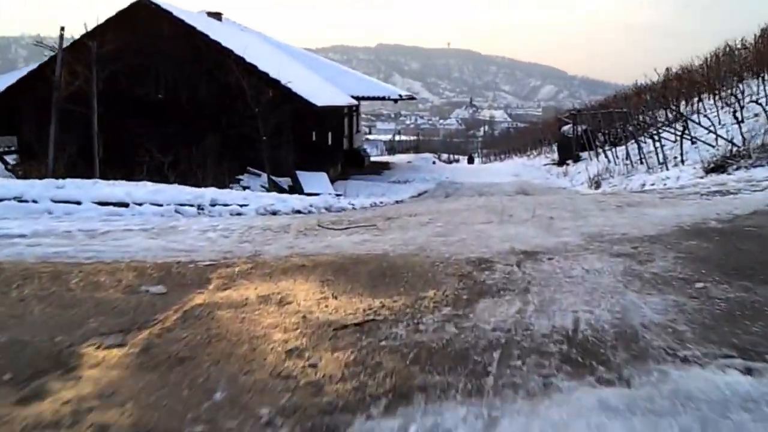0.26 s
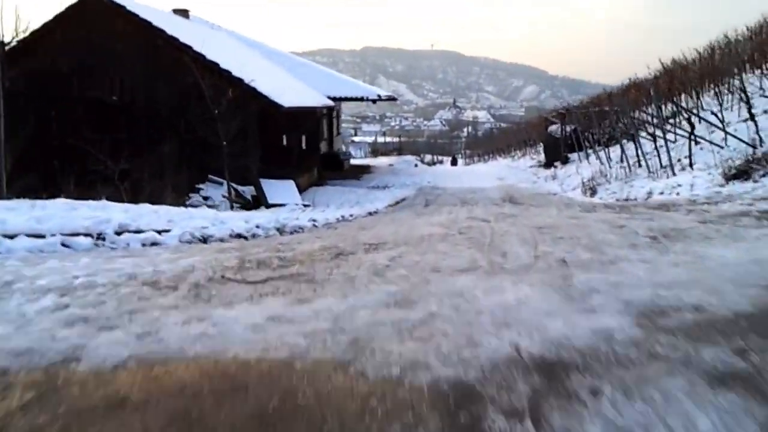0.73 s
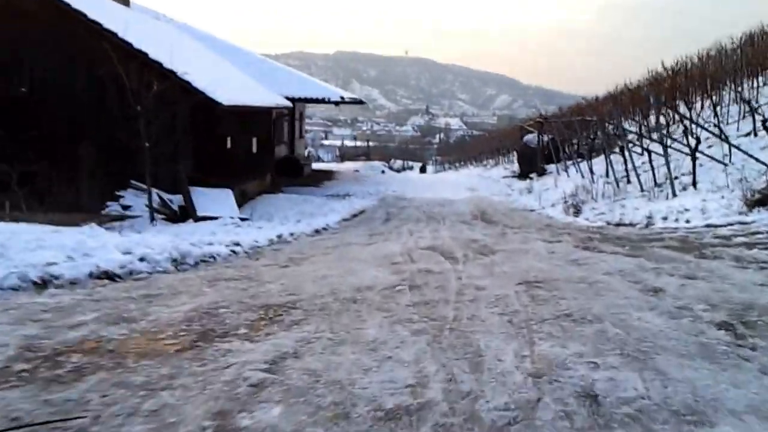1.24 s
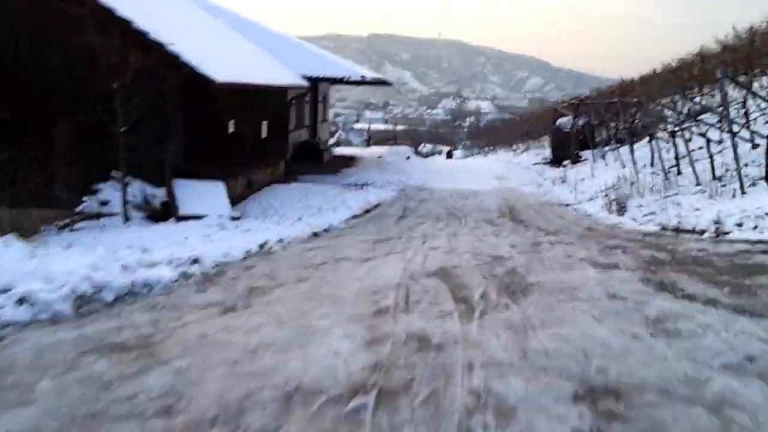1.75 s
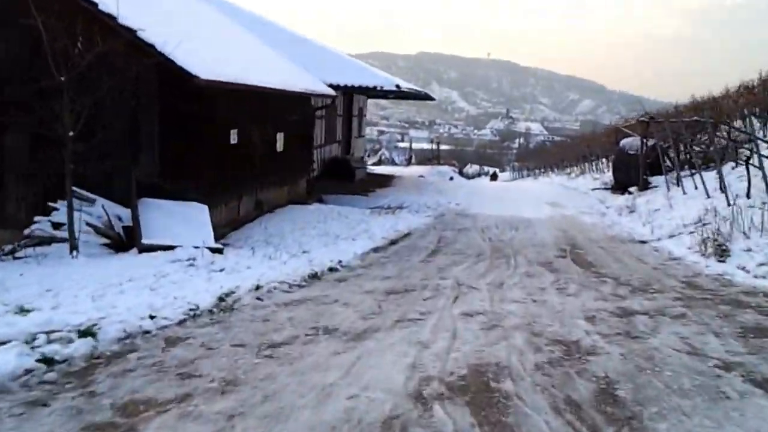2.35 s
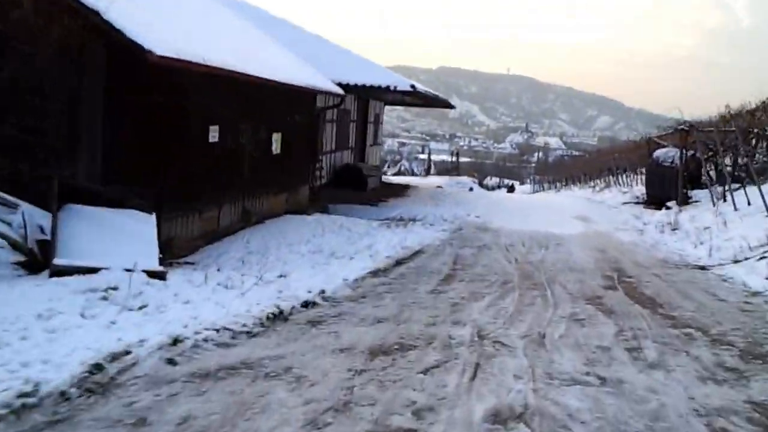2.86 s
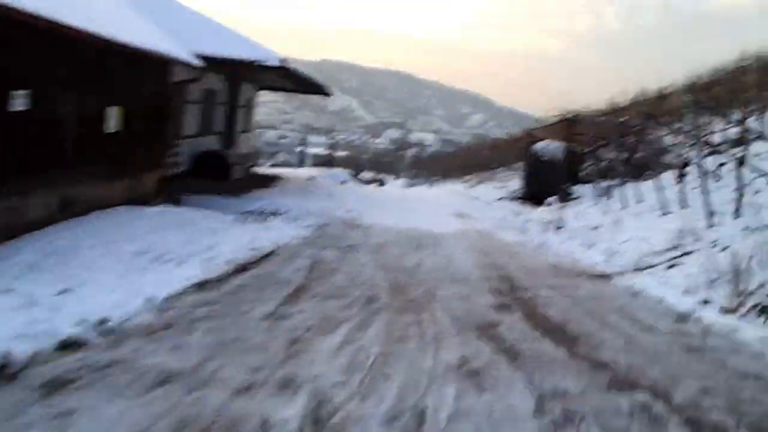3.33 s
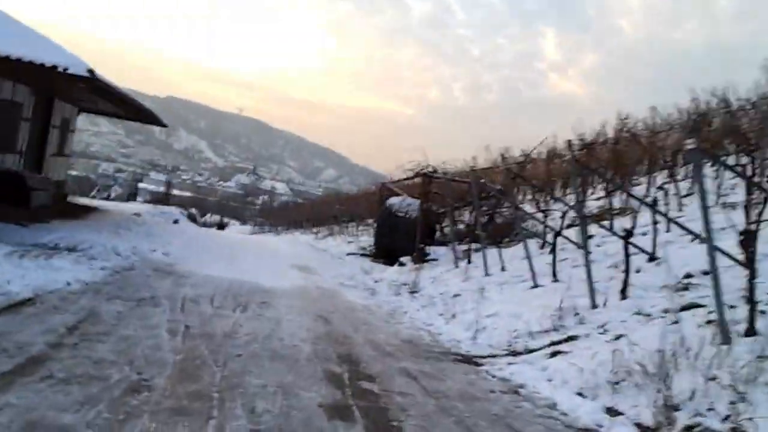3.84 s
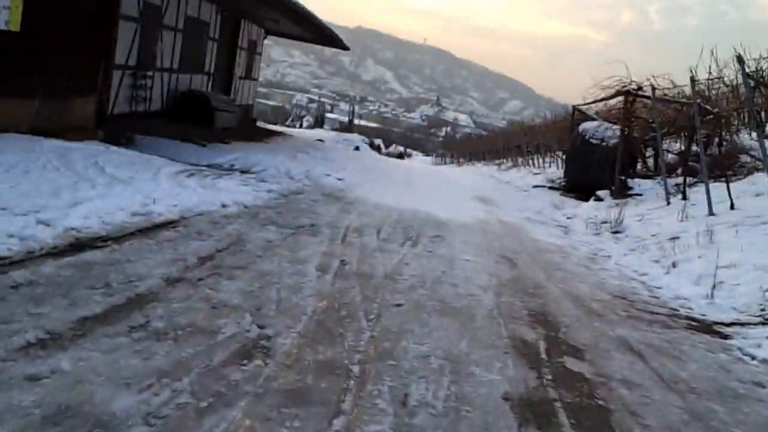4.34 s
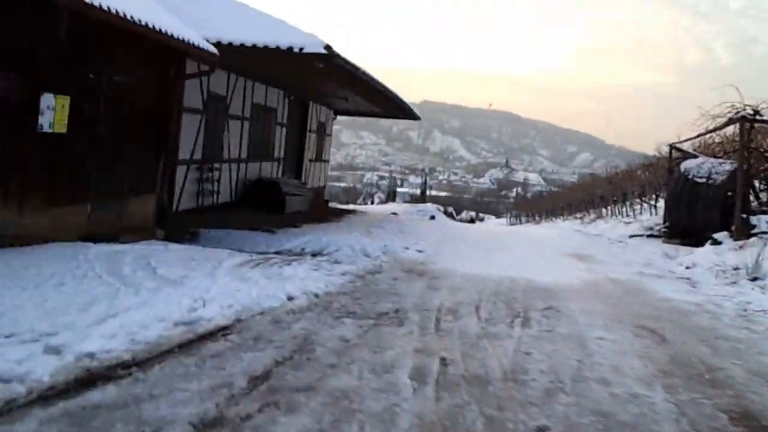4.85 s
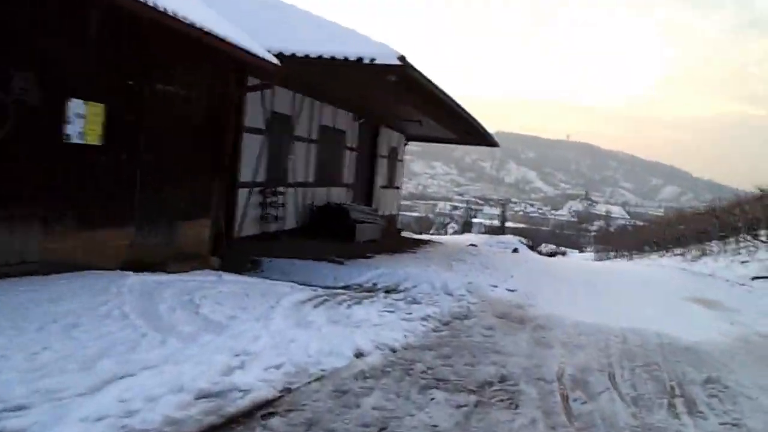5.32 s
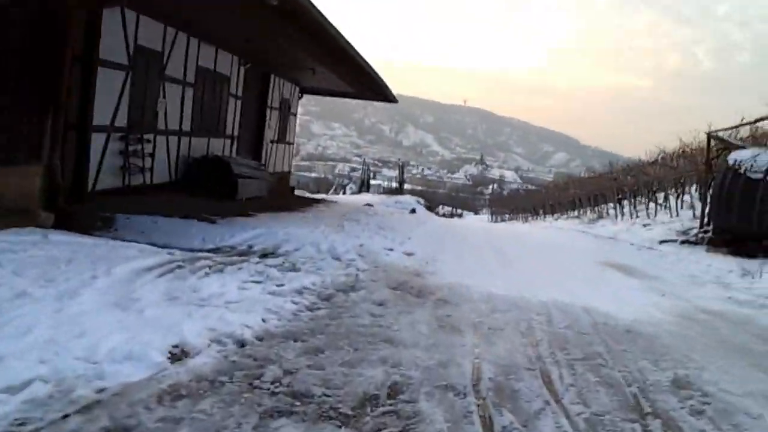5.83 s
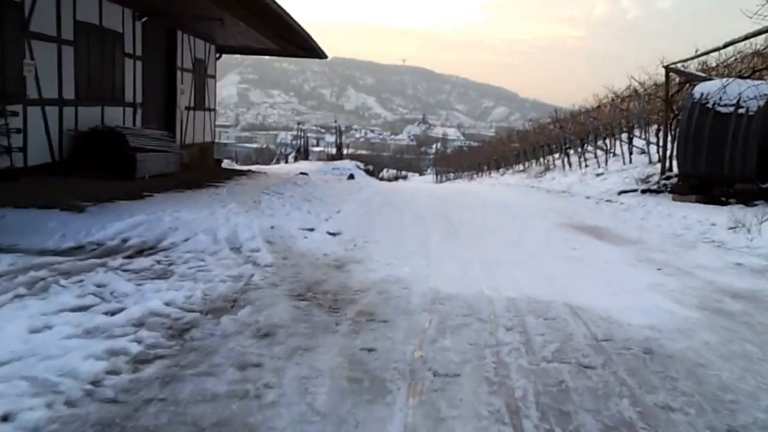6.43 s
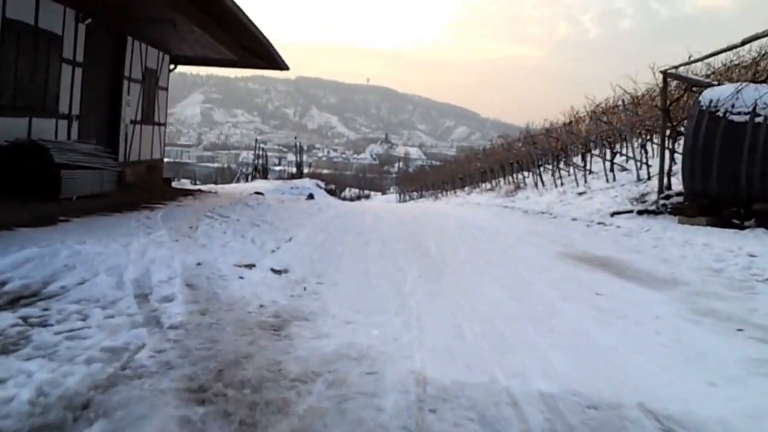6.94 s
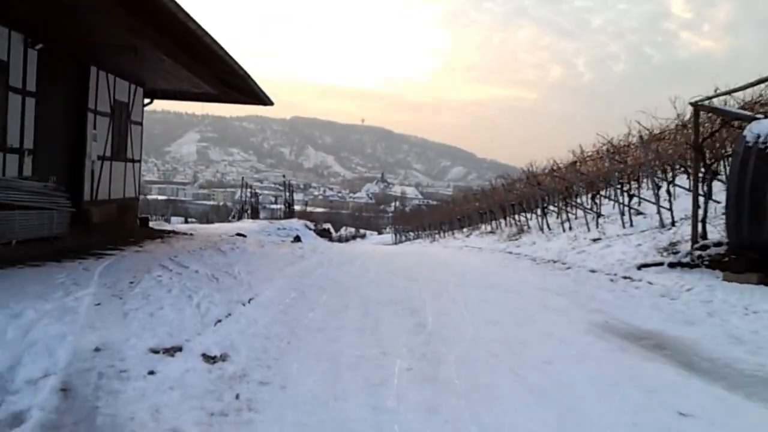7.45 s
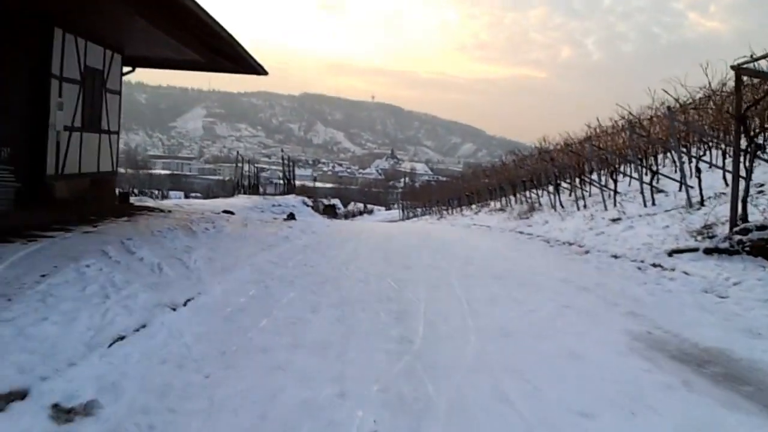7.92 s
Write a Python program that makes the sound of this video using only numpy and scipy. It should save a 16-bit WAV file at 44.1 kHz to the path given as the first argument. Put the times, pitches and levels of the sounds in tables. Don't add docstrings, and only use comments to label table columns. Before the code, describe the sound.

Close onboard sled ride: gritty icy scraping, flapping wind blasts strongest at right, a quieter stretch of singing steel, then renewed gusts and softer hiss.

```python
import sys
import numpy as np
from scipy import signal
from scipy.io import wavfile
from scipy.ndimage import uniform_filter1d

SR = 44100
rng = np.random.default_rng(int(sys.argv[2]) if len(sys.argv) > 2 else 0)


def generate_wav(signal):
    frames = np.transpose(np.atleast_2d(signal))
    scaled = np.clip(frames, -1, 1) * 32767
    pcm = np.round(scaled).astype(np.int16)
    wavfile.write(sys.argv[1], SR, pcm)


def gain_from_decibels(decibels):
    exponent = np.asarray(decibels, float) / 20
    return 10 ** exponent


N = 360738
TIME = np.arange(N) / SR
HZ = np.fft.rfftfreq(512, 1 / SR)


def evened(x):
    return x / np.sqrt(np.mean(x ** 2, -1, keepdims=True) + 1e-20)


def read(rows):
    f, *columns = np.transpose(rows)
    return np.array([np.interp(np.log(HZ + 1), np.log(f), c) for c in columns])[..., None]


def follow(rows):
    s, *columns = np.transpose(rows)
    return np.array([np.interp(TIME, s, c) for c in columns])


def noise(colour_db, same=0, lead=0, patchy_db=2.0):
    a, b, c, d, patch = rng.standard_normal((N // 128 + 5, 257, 5)).T
    patch = uniform_filter1d(patch, size=6, axis=0)
    patch = uniform_filter1d(patch, size=14, axis=1)
    right = a + 1j * b
    own = c + 1j * d
    same = np.clip(same, 0, 1)
    left = same * right * np.exp(1j * lead) + np.sqrt(1 - same ** 2) * own
    z = np.array([left, right]) * gain_from_decibels(colour_db + patchy_db * patch / patch.std())
    return signal.istft(z, nperseg=512, noverlap=384)[1][:, :N]


def flicker(hz, depth_db, channels=1):
    x = signal.lfilter(*signal.butter(2, hz, fs=SR), rng.standard_normal((channels, N)))
    return evened(gain_from_decibels(depth_db * np.clip(evened(x), -3, 1.6)))


def hump(s, ms, rise=1, order=2):
    at = round(s * SR)
    part = slice(max(at - 2200, 0), at + 2200)
    u = (TIME[part] - s) * 2000 / ms
    u = np.where(u < 0, u / rise, u * rise)
    return part, np.exp(-np.log(2) * abs(u) ** order)


def gust(start, end, start_db, end_db):
    edge_s = 0.054
    gate = np.clip(np.minimum(TIME - start, end - TIME) / edge_s + .5, 0, 1)
    return (gate * gain_from_decibels(np.interp(TIME, [start, end], [start_db, end_db]))) ** 2


def flow():
    # t/s, left level/dB, right level/dB
    breeze = [(0, -16.5, -21.5), (1, -22.5, -17), (1.3, -31, -17.5), (2.3, -24.5, -22), (3.4, -31, -19.5),
              (3.52, -33, -23), (3.8, -39, -22), (4, -41, -44), (4.4, -36, -38), (4.68, -36, -60),
              (5.2, -35, -48), (5.4, -29, -39), (5.6, -30.5, -43), (6.47, -32, -32), (6.78, -35, -40),
              (7.2, -26.5, -23), (7.45, -47, -31), (8.18, -33, -29)]
    # start t/s, end t/s, start level/dB, end level/dB
    gusts_left = [(-.1, .14, -13, -25), (0.323, 0.498, -16, -15), (0.723, 0.904, -17.5, -19),
                  (1.34, 2.1, -17, -21), (2.247, 2.565, -22, -15), (2.885, 3.068, -21, -21),
                  (3.597, 3.86, -23, -33), (5.333, 5.787, -38, -18), (6.46, 6.777, -28.5, -24.5),
                  (7.017, 7.237, -24, -48), (7.752, 8.3, -30, -29)]
    # start t/s, end t/s, start level/dB, end level/dB, share of fast eddies level/dB
    gusts_right = [(-.1, 0.358, -16, -14, -14), (0.376, 0.89, -11.5, -15, -6), (1.063, 1.309, -9.5, -14, 2),
                   (1.437, 1.93, -14, -11.5, -10.5), (2.023, 2.214, -11.5, -9, -4),
                   (2.27, 2.473, -24, -17, -8), (2.494, 2.827, -5.5, -11.5, -3.5),
                   (2.857, 3.148, -3.5, -11, -2.5), (3.143, 3.455, -12, -11.5, 1),
                   (5.756, 6.078, -13.5, -9, -12), (6.047, 6.45, -12, -11, -8.5),
                   (7.266, 7.694, -10, -12, -12), (7.67, 8.065, -17, -15, -13)]
    breeze_fast_db = -5
    left, right = gain_from_decibels(follow(breeze)) ** 2
    fast = right * gain_from_decibels(breeze_fast_db) ** 2
    left = left + sum(gust(*row) for row in gusts_left)
    for *row, fast_db in gusts_right:
        power = gust(*row)
        right = right + power
        fast = fast + power * gain_from_decibels(fast_db) ** 2
    return 10 * np.log10([left, right, fast])


def skid():
    # start t/s, end t/s, level/dB, start f/Hz, end f/Hz, bandwidth f/Hz
    sing = [
        (3.447, 3.76, -23.5, 1400, 1440, 120),
        (3.93, 4.807, -27.5, 1030, 1130, 130),
        (4.164, 4.84, -22, 2720, 2580, 300),
        (4.38, 4.828, -24.5, 3070, 2960, 400),
        (4.04, 4.2, -25, 1780, 1870, 150),
        (5.57, 5.703, -19.5, 2950, 3000, 500),
    ]
    whistle = np.zeros(N)
    for start, end, db, from_hz, to_hz, width in sing:
        pitch = np.interp(TIME, [start, end], [from_hz, to_hz])
        turn = np.exp(2j * np.pi * np.cumsum(pitch) / SR)
        band = signal.lfilter(*signal.butter(1, width / 2, fs=SR), rng.standard_normal(N) / turn)
        whistle += evened((band * turn).real) * np.sqrt(gust(start, end, db, db))
    return whistle * flicker(41.0, 3.5) * gain_from_decibels(np.array([[-6], [3]]))


def load(flow_db):
    # t/s, pressure level/dB, frame-shaking roughness level/dB
    slide = [(0, -4, 3.5), (.6, -15, 3), (1, -11.5, -14.5), (1.3, -15, -1), (1.9, -10, -4.5),
             (2.3, -19, -5), (2.9, -9.5, -1.5), (3.3, -8.5, -1.5), (3.6, -12, -5), (4.5, -13.5, -5),
             (4.9, -14.5, -9), (5.25, -12, -9.5), (5.65, -15, -9.5), (5.85, -7.5, -6), (6.55, -14.5, -12),
             (7.25, -9, -13.5), (7.6, -10.5, -15), (8.18, -22.5, 0)]
    # t/s, length/ms, level/dB
    ruts = [(.09, 360, -12.5), (.36, 103, -13), (.57, 170, -3), (.685, 60, 0), (.8, 82, -4),
            (.99, 180, 5.5), (1.14, 50, -5), (1.19, 44, 6), (1.26, 180, -4.5), (1.42, 70, 4),
            (1.575, 57, -3.5), (1.756, 37, -9), (1.93, 61, 2), (2.15, 130, -4.5), (2.49, 174, 7),
            (2.69, 113, -14), (2.775, 59, -16), (2.99, 120, 6), (3.9, 50, 1), (5.2, 60, 2), (5.41, 180, -3),
            (5.94, 140, -2.5), (6.11, 120, -5.5), (6.46, 80, 0), (6.559, 100, 3), (6.91, 70, 3.5),
            (7.02, 380, -4), (7.13, 66, 2.5), (7.69, 87, -4.5), (7.98, 130, 2.5)]
    duck_from_db, duck_share, duck_s = -23.5, 0.75, 0.14
    rut_flat = 3.8
    frame_feels = 1.31
    pressure_db, rough_db = follow(slide)
    excess_db = np.maximum(flow_db[1] - duck_from_db, 0)
    change_db = -duck_share * uniform_filter1d(excess_db, round(duck_s * SR))
    for s, ms, db in ruts:
        part = slice(max(round((s - ms / 500) * SR), 0), round((s + ms / 500) * SR))
        u = (TIME[part] - s) * 2000 / ms
        change_db[part] += db * np.exp(-np.log(2) * abs(u) ** rut_flat)
    return pressure_db + np.array([change_db, rough_db + frame_feels * change_db])


def runners(flow_db):
    # t/s, hiss level/dB, relative frame rumble level/dB, length/ms
    scrapes = [(0.087, -13.5, -3.5, 12), (0.105, -4.5, -31, 3.2), (0.219, -8, -1.5, 8.6),
               (0.235, -0.5, -25, 4.1), (0.387, -13.5, 2.5, 17), (0.401, 4.5, -20, 1.7),
               (0.631, -8, -9, 11.5), (0.661, -11, 0, 18.5), (0.703, -11, -8, 21), (0.811, -15, 16, 3.3),
               (0.892, -1, -8.5, 6.7), (.932, -11, -18, 17), (1.04, -15, -5, 19), (1.444, -19.5, 12, 14),
               (1.596, -15, 5, 6.3), (1.673, -13, -9, 4.7), (2.354, -11, -10, 11), (2.403, -15, 6, 4.1),
               (2.834, -9, -20, 3), (2.955, -7, -2, 3.8), (3.477, -5, -20, 4), (3.546, -13.5, 0, 11),
               (4.257, -14.5, 1, 59), (4.959, -10, -20, 6.6), (5.01, -11, -0.5, 24), (5.433, -13, -14, 18),
               (5.524, -3.5, -0.5, 7.4), (5.582, -9, 4.5, 9.3), (5.64, -20.5, 5, 28),
               (5.691, -21.5, 15.5, 13), (5.8, -15, 2.5, 26), (6.573, -9, -13, 6), (6.686, -6.5, -1.5, 14),
               (7.115, -12.5, -6, 18)]
    # f/Hz, left level/dB, right level/dB
    ports = [(150, -70, -83), (2000, -13, -17), (4670, -15, -6.5), (6390, -19.5, -21), (7800, -13.5, -21),
             (9930, -4, -22.5), (12360, -11.5, -24.5), (15500, -21, -28.5)]
    # f/Hz, level/dB, coherence/1, lead of the left phase/rad
    frame_colour = [(120, -11, 0.32, 1.6), (274, -2, 1, 2.28), (1090, -2.5, 0.72, 2.48),
                    (1800, -1.5, 0.079, 4.6), (3000, -3, 0.94, 5.26), (5340, -8.5, 0.13, 3.1),
                    (7900, -26.5, .1, 3.2)]
    # f/Hz, bandwidth f/Hz, level/dB
    frame_modes = [(1135, 560, 10), (1416, 62, 8), (1930, 180, 4)]
    power = gain_from_decibels(load(flow_db)) ** 2
    for s, db, frame_db, ms in scrapes:
        part, shape = hump(s, ms * 1.3, rise=0.55)
        power[:, part] += (gain_from_decibels(np.array([[db], [db + frame_db - 5.5]])) * shape) ** 2
    hiss_gain, frame_gain = np.sqrt(power) * flicker(23.0, 1.0) * flicker(520.0, 0.32)
    hiss = noise(read(ports), patchy_db=1.32)
    colour_db, same, lead = read(frame_colour)
    for hz, width, db in frame_modes:
        colour_db = colour_db + db / (1 + (2 * (HZ[:, None] - hz) / width) ** 2)
    frame = evened(noise(colour_db, same, lead, patchy_db=3.0)) * gain_from_decibels(np.array([[1.5], [5.5]]))
    frame = frame * frame_gain * flicker(54.0, 1.66)
    mount = signal.butter(2, 200., "highpass", fs=SR)
    frame = signal.lfilter(*mount, signal.lfilter(*mount, frame))
    return hiss / hiss[0].std() * hiss_gain + frame


def slap(s, db, ms, hz):
    part, shape = hump(s, ms, order=4)
    wander, lumps = evened(uniform_filter1d(rng.standard_normal((2, 4400)), size=50))[:, :len(shape)]
    wander_db = min(2.8, (4200 / hz) ** 2) * wander
    turns = np.cumsum(hz * gain_from_decibels(wander_db)) / SR
    swirl = shape * gain_from_decibels(4.23 * lumps) * np.sin(2 * np.pi * turns)
    return part, gain_from_decibels(db - 6.5) * swirl * np.linalg.norm(shape) / np.linalg.norm(swirl)


def eddies(flow_db):
    # t/s, level/dB, length/ms
    smaller_eddies = [(0.216, -6, 5.8), (0.307, 0, 4.3), (0.322, -5, 4.3), (0.355, -2.5, 4.4), (0.387, -2, 7),
                      (0.436, -2, 4.6), (0.532, 6, 4), (0.57, -5, 5), (0.612, 2.5, 2.9), (0.655, -3, 7),
                      (0.759, -0.5, 3.9), (0.813, 1, 4), (0.875, -5, 5), (0.95, -1, 3.6), (1.069, -2, 18),
                      (1.103, -3, 4.7), (1.116, 7, 3.6), (1.146, -1, 16), (1.21, 1.5, 10), (1.225, 2, 7.7),
                      (1.238, -0.5, 7.8), (1.271, -3.5, 9), (1.287, 0.5, 8), (1.305, -2, 4.3),
                      (1.513, -0.5, 13), (1.578, -1, 3.7), (1.661, 4, 3.5), (1.708, -2, 7.5), (1.719, 0, 2.7),
                      (1.742, -4, 6.5), (1.758, -3, 4.8), (1.858, 2, 6.2), (1.874, 1, 2.7), (2.0, 1, 7),
                      (2.044, -4, 4.1), (2.165, -2, 11), (2.18, -3, 18), (2.344, -11, 4), (2.381, -16, 5.1),
                      (2.46, -1, 15), (2.557, 0, 13), (2.614, -5, 6.8), (2.643, -3, 19), (2.693, 1, 5),
                      (2.724, 0, 6), (2.762, -3.5, 5), (2.888, 8, 4.4), (2.972, 6, 6.8), (2.995, 1, 16),
                      (3.04, 3, 11), (3.05, 4, 4.6), (3.136, 0, 3), (3.164, 2, 8), (3.202, -3, 4),
                      (3.21, -1.5, 7), (3.302, 0, 6.4), (3.34, 2, 9), (3.373, -2, 5.9), (3.4, 0, 5),
                      (3.417, -1, 4.9),
                      (5.793, -2, 6.2), (5.818, -7, 7.1), (5.859, -4, 4), (5.903, 1.5, 5), (5.931, 1, 5.5),
                   (5.956, -9, 3.7), (5.977, -1, 5.5), (5.997, 0, 7.9), (6.013, 0, 7.3),
                   (6.058, -2.5, 12.5), (6.083, 1, 4), (6.121, -3, 4), (6.131, -2, 8.1), (6.167, -6, 2.3),
                   (6.18, -2, 4.9), (6.194, -5, 4), (6.215, 1, 6.5), (6.236, -2, 7), (6.263, -1, 3),
                   (6.283, 5, 3.6), (6.342, 2, 5.5), (6.386, -9, 14), (6.402, -6, 7.6), (6.415, 1, 4.1),
                   (6.686, -8, 5), (7.108, -7.5, 3.3), (7.231, -2, 2.8), (7.258, -5.5, 14), (7.281, 0, 2.7),
                   (7.314, -0.5, 5.7), (7.335, -1.5, 6.5), (7.345, -2, 4.2), (7.361, 3, 3.5),
                   (7.397, -3, 10), (7.407, 0, 4.7), (7.422, -4, 4), (7.447, 0, 6.6), (7.48, -9, 4.3),
                   (7.508, 1, 5.1), (7.515, -11, 9.8), (7.529, -8, 6.5), (7.56, 3, 4.3), (7.571, -8, 2.7),
                   (7.584, 0, 6.4), (7.601, -1, 5), (7.61, 0, 3.6), (7.664, -1, 6), (7.702, 6, 4.5),
                   (7.724, -5, 3.8), (7.741, -1, 3.3), (7.753, -7, 5.6), (7.775, -6, 4.4),
                   (7.789, -2.5, 2.6), (7.875, -5.5, 6), (7.965, -8, 8), (7.981, -3.5, 11),
                   (8.081, -0.5, 4.6), (8.121, -10.5, 7.9)]
    base_hz, hz_per_db = 950, 21
    s, db, ms = np.transpose(smaller_eddies)
    _, right_db, fast_db = flow_db[:, (s * SR).astype(int)]
    hz = base_hz + hz_per_db * (fast_db - right_db)
    hz = hz * np.exp(0.0815 * rng.standard_normal(len(s)))
    return zip(s, db, ms, hz)


def wind(flow_db):
    # f/Hz, left level/dB, right level/dB
    air_colour = [(25, -12, -14), (91.5, -4, -37), (300, 4.5, 0), (550, -5.5, 1), (1000, -19.5, -9.5),
                  (2240, -21.5, -39), (6060, -41, -61)]
    # t/s, length/ms
    lulls = [(0.344, 9.3), (0.739, 10), (0.839, 18), (1.783, 22), (2.218, 25), (2.246, 18), (2.427, 11),
             (2.795, 22), (2.922, 97), (3.092, 17), (5.126, 29), (5.719, 36), (5.743, 27), (5.872, 10),
             (6.069, 11), (6.103, 10), (6.252, 15), (6.325, 9.9), (6.444, 16), (7.38, 6.9), (7.489, 15),
             (7.68, 22), (7.819, 36), (8.007, 18), (8.031, 23)]
    # t/s, level/dB, length/ms, f/Hz
    slaps_left = [(0.014, -3, 27, 411), (0.227, -11, 14, 505), (0.245, -7, 19, 355), (0.391, -3, 27, 681),
                  (0.472, -6, 6.9, 352), (0.607, -1.5, 11, 404), (0.748, -10, 12, 476),
                  (0.809, -5, 25, 501), (0.876, 2, 5.5, 437.7), (1.423, -6, 8.2, 353),
                  (1.546, -12, 19, 458), (1.611, -9, 36, 422), (1.783, -6, 14, 329), (2.019, 5, 5.6, 368),
                  (2.089, 2.5, 3.7, 343), (2.341, -1, 8.4, 398), (2.373, -5, 8.7, 360),
                  (2.541, -5, 7.9, 640), (2.583, -5, 6.2, 487), (2.956, -13, 8.1, 673),
                  (4.564, -4.5, 7.7, 1080), (5.174, -7, 14, 1090), (5.381, -4.5, 4, 340),
                  (5.514, -6, 10, 880), (5.697, -4, 5.2, 502), (6.688, -11, 7.7, 657), (.091, -8, 4, 666),
                  (0.179, -13, 3.2, 554), (.313, -4, 9.1, 416), (0.453, -12, 4.6, 400),
                  (.985, -4, 4.9, 605), (1.474, -8, 8.2, 480), (1.951, -5, 3.7, 468), (2.26, -4, 6.2, 506),
                  (7.82, -12, 5, 329), (7.881, -9, 12, 277), (8.147, -10, 12, 300)]
    # t/s, level/dB, length/ms, f/Hz
    chips_left = [(0.147, -6, 3, 1815), (.811, 1, 0.99, 2000), (1.179, -6, 5, 600), (2.383, -3, 4.3, 1490),
                  (3.905, -13.5, 16, 449), (5.18, -11, 29, 479), (5.441, -8, 5.9, 374),
                  (5.692, -3, 7.6, 2510), (5.793, -6, 6.8, 1250), (6.776, -3.5, 8, 318),
                  (7.753, -9, 11, 916), (7.918, -13, 8, 1250), (8.121, -19, 5, 1500)]
    # t/s, level/dB, length/ms, f/Hz
    slaps_right = [(0.487, 3, 18, 742), (0.513, 2, 11, 675), (0.646, 0, 6.7, 804), (1.086, 1.5, 58, 784),
                   (1.685, 5, 4.5, 526), (2.076, 16, 11, 640), (2.114, 9.5, 18.5, 739), (2.157, 3, 16, 710),
                   (2.492, 2, 9.2, 483.6), (2.514, 20, 7.7, 888), (2.584, 14, 10, 879),
                   (2.867, 4, 3.7, 715), (2.958, 4.5, 19, 689), (3.071, -1, 17, 658), (3.458, 2, 3.6, 1000),
                   (5.824, 3, 20, 571), (5.889, -0.5, 19, 640), (6.005, -0.5, 16, 741),
                   (6.034, -1, 19, 560), (6.142, 9, 6.9, 912), (6.273, -5, 27, 645), (6.296, 1, 10, 954),
                   (6.333, 14, 2.5, 852), (6.357, 6, 6.5, 740), (7.304, 6.5, 4.2, 520),
                   (7.62, 0, 6.4, 406.4), (7.649, 5.5, 4.3, 544), (7.901, 3, 5.7, 603), (7.946, 6, 6, 550),
                   (8.066, 6.5, 5, 656), (8.057, 1, 8, 520)]
    # t/s, level/dB, length/ms, f/Hz
    knocks_right = [(0.483, 6, 5, 1200), (1.152, -2, 1.7, 3530), (1.388, -0.5, 6, 3000),
                    (1.577, -3, 3.7, 2000), (2.348, -5, 9.8, 1350), (2.386, -2, 5, 1400),
                    (2.53, 0, 22, 764), (3.476, 2, 5.4, 5150), (4.42, -7, 13, 2920), (4.529, -8, 22, 307.5),
                    (4.549, -10, 8, 2900), (4.715, -2, 13, 2670), (4.781, -3, 12, 3170),
                    (5.003, -8.5, 5.4, 1230), (5.02, -7, 20, 1400), (5.06, -9.5, 16, 1150),
                    (5.176, 0, 16, 1400), (5.493, 1, 5.8, 403), (5.515, 0, 4, 1706), (5.522, -9, 12, 696),
                    (5.531, -3, 4.6, 460), (5.659, -9, 10, 350), (7.648, 0, 1.8, 2190),
                    (7.846, -6.5, 17, 462), (7.918, -9, 5.2, 1300)]
    lumps_db, lumps_even = 4, 0.074
    stream_db = -2
    low = evened(noise(read(air_colour), patchy_db=1.5)) * gain_from_decibels(flow_db[:2])
    band = signal.butter(2, [800., 2300.], "bandpass", fs=SR)
    low[1] += evened(signal.lfilter(*band, rng.standard_normal(N))) * gain_from_decibels(flow_db[2])
    evening_db = lumps_even * (flow_db[2] - flow_db[1] + 15.0) * np.array([[0], [1]])
    air = low * flicker(112.0, lumps_db - evening_db, channels=2)
    air[1] *= gain_from_decibels(stream_db)
    for s, ms in lulls:
        part, shape = hump(s, ms, order=6)
        air[1, part] *= 1 - 0.78 * shape
    left = slaps_left + chips_left
    right = slaps_right + knocks_right + list(eddies(flow_db))
    for port, slaps in zip(air, (left, right)):
        for row in slaps:
            part, swirl = slap(*row)
            port[part] += swirl
    return air


def scene():
    flow_db = flow()
    return skid() + runners(flow_db) + wind(flow_db)


def roll_off(x):
    return signal.sosfilt(signal.butter(12, 14900, fs=SR, output="sos"), x)


def record(dry):
    cut = signal.lfilter(*signal.butter(2, 130., "highpass", fs=SR), dry)
    hz, _, z = signal.stft(np.clip(cut, -.99, .99), SR, nperseg=2048)
    power = uniform_filter1d(abs(z) ** 2, size=7, axis=1)
    treble = power[:, (hz > 3000) & (hz < 12000)].mean(1, keepdims=True)
    kept = (power > gain_from_decibels(-2 * 9) * treble) | (hz[:, None] < 4500)
    audible = z * kept * (hz[:, None] < 14900)
    thinned = signal.istft(audible, SR, nperseg=2048)[1][:, :N]
    return roll_off(thinned)


dry = scene()
out = record(dry)
generate_wav(out)
```